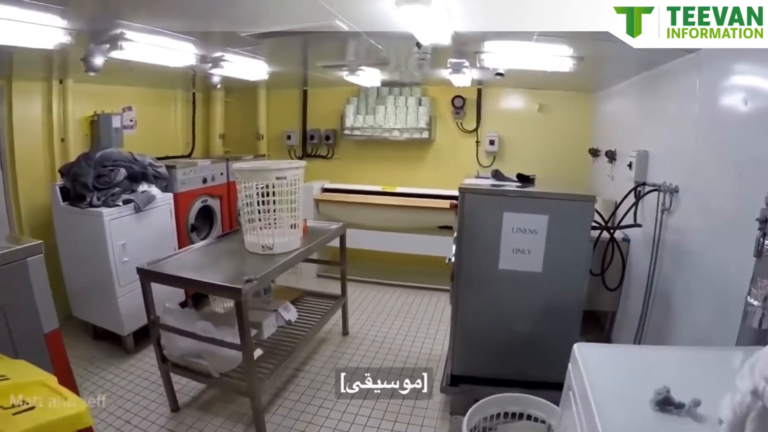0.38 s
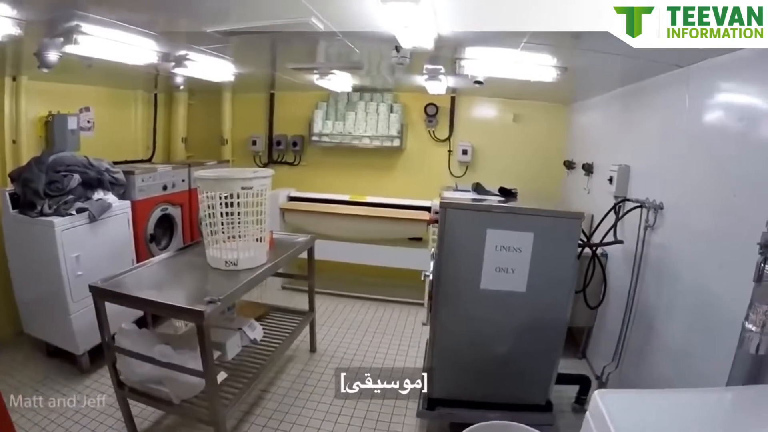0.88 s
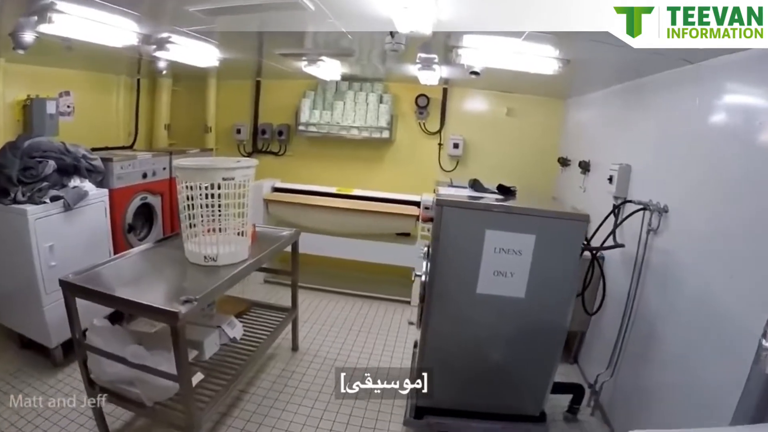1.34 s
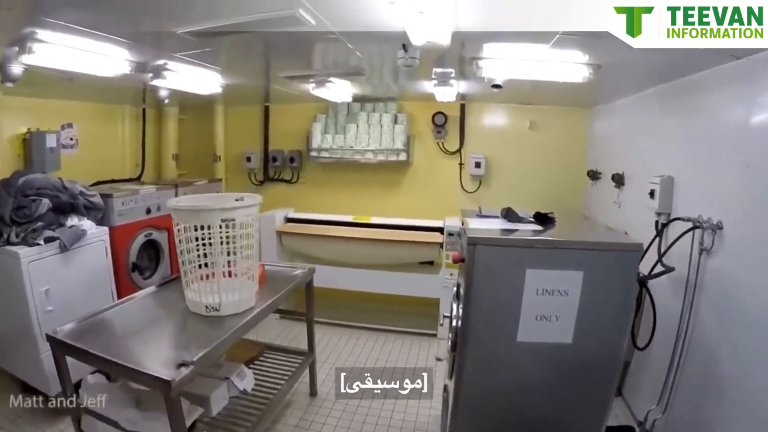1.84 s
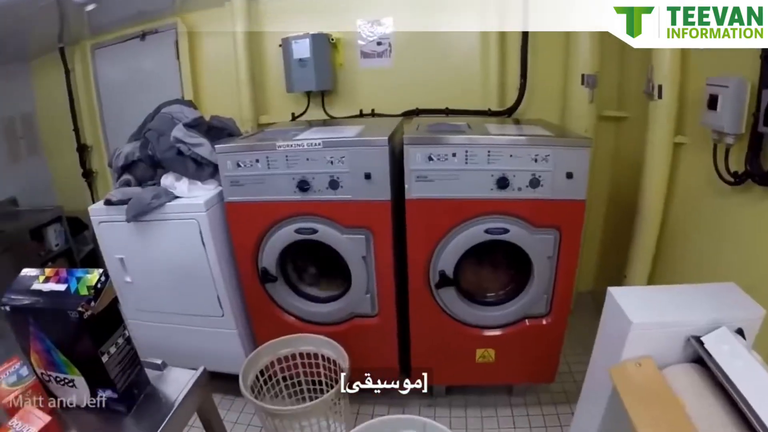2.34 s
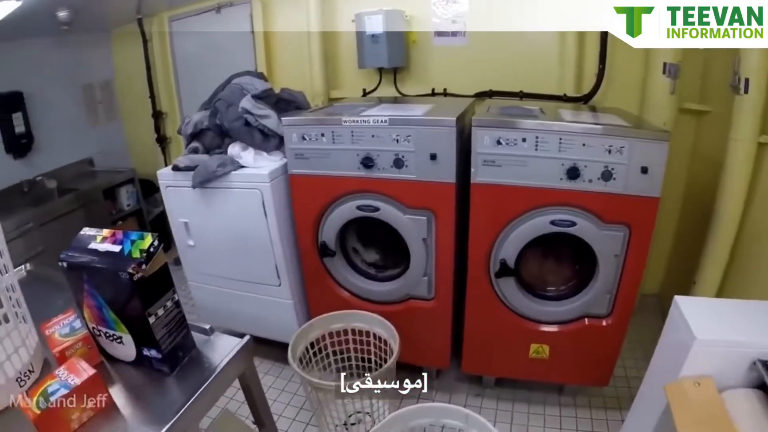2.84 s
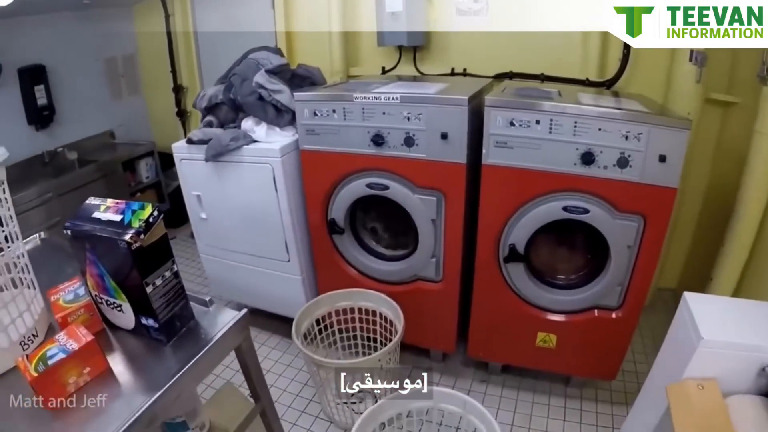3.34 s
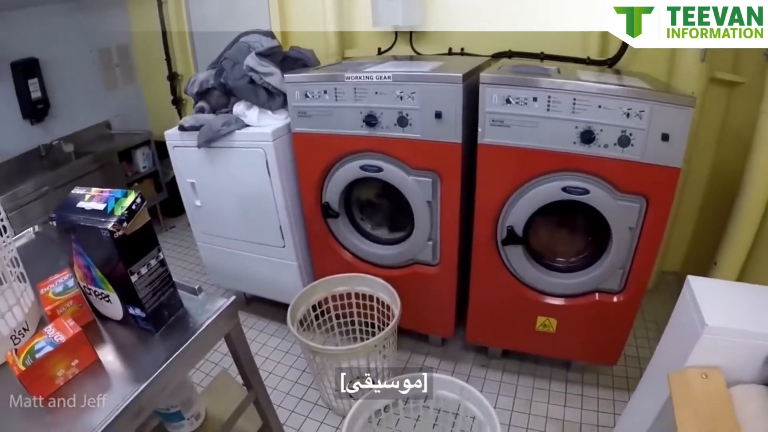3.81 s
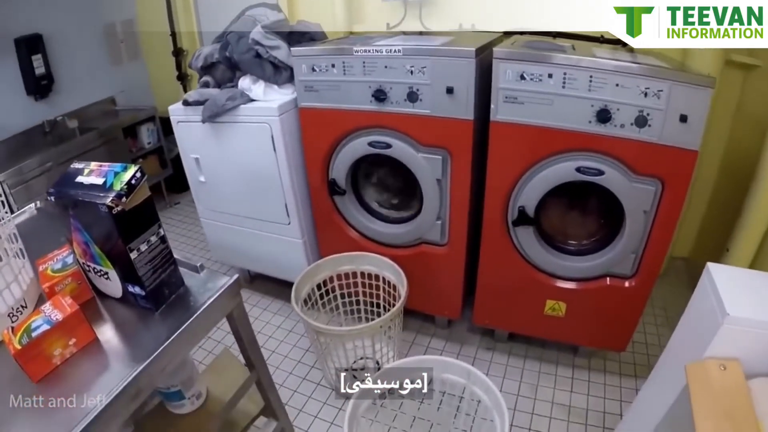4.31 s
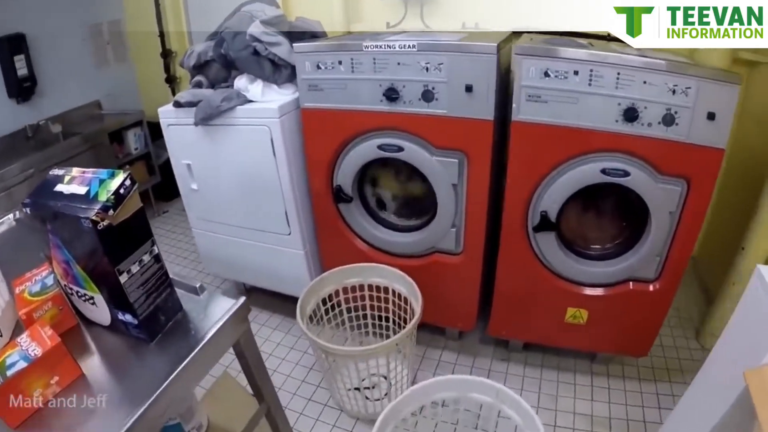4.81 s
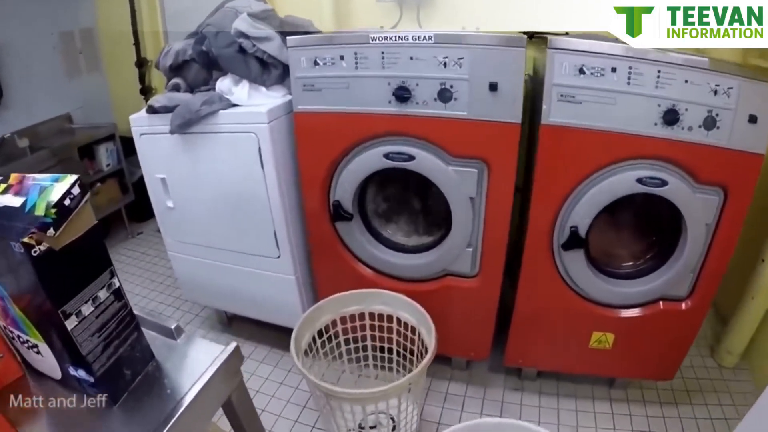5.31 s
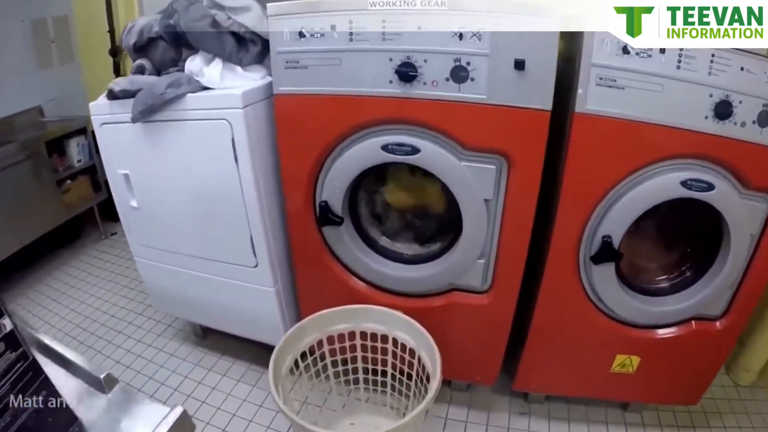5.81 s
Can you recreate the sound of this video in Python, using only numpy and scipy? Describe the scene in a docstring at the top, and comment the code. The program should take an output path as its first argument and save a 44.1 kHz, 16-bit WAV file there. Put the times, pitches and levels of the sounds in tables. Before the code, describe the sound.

In an enclosed metal-walled laundry room, a low machinery rumble drones throughout, uneven and gently swelling, with fan tone and electrical hum inside it. Near two seconds there is one dry click, then a very faint spray hiss sputters up, with tiny drops ticking. One fixed-sounding microphone hears it all, with dull treble.

```python
"""A steady machinery drone fills an enclosed steel room; after one dry click a thin hiss of spraying water fades in.
One microphone hears it all. Rumble is noise ringing in narrow resonances, the loudest of them swelling now and then;
fan, mains hum and small motors are wavering sines, and dull air noise is filtered noise.
The spray is flickering noise with a scatter of tiny drops; larger drops ping as brief clusters of partials,
and pipes whistle as thin tones that come and go."""
import sys
import numpy as np
from scipy import signal
from scipy.fft import rfft, irfft
from scipy.io import wavfile
from scipy.ndimage import uniform_filter1d

SR = 44100
rng = np.random.default_rng(int(sys.argv[2]) if len(sys.argv) > 2 else 0)


def dump(signal):
    """Clip the signal to [-1, 1] and save it as 16-bit WAV at the path in sys.argv[1]."""
    limited = np.clip(np.atleast_2d(signal).T, -1, 1)
    pcm = np.round(limited * 32767).astype(np.int16)
    wavfile.write(sys.argv[1], SR, pcm)


def volts_from_db(level):
    """Convert decibel levels to linear amplitude ratios."""
    exponent = np.asarray(level, float) / 20
    return 10 ** exponent


N = 261072  # length in samples
T = np.arange(N) / SR  # time of every sample, s
HZ = np.fft.rfftfreq(N, 1 / SR)  # frequency of every spectrum bin


def evened(x):
    """Scales to rms 1."""
    return x / np.sqrt(np.mean(x ** 2) + 1e-20)


def colour(points):
    """Gain at every frequency from (Hz, dB) points, joined on a log frequency axis, silent outside."""
    hz, db = np.transpose(points)
    return volts_from_db(np.interp(np.log(HZ + 1), np.log(hz + 1), db, left=-200, right=-200))


def curve(points):
    """Value at every moment from (s, value) points."""
    return np.interp(T, *np.transpose(points))


def noise(gain):
    """White noise filtered by a gain at every frequency."""
    return irfft(rfft(rng.standard_normal(N)) * gain, N)


def slow(hz):
    """Slow random movement of rms 1, mostly below hz."""
    return evened(noise(np.exp(-(HZ / hz) ** 2)))


def resonance(hz, width_hz):
    """Power response of one resonance, 1 at its centre."""
    return 1 / (1 + (2 * (HZ - hz) / width_hz) ** 2)


# dull air noise of the room, relative spectrum: pitch_hz [Hz], level_db [dB per Hz]
AIR = [(710, -31), (1200, -5.5), (1330, -5), (1520, -5), (1570, -8.5), (1680, -8.5), (1750, -4.5),
       (1910, -5), (1960, -9), (2100, -13), (2280, -16), (2420, -14.5), (2550, -18.5), (2680, -20),
       (2800, -21.5), (2950, -25.5), (3480, -27.5), (3860, -28.5), (6270, -47), (8340, -57), (9500, -71.5),
       (12400, -100), (20900, -120)]
# faint shaking below the resonances, relative spectrum: pitch_hz [Hz], level_db [dB per Hz]
SHAKE = [(20, -26.5), (33, -18), (40, -11), (48, -7), (56, -0.5), (64, -34)]
AIR_DB, SHAKE_DB = -47, -55.5  # rms


def air():
    """Broad air noise, rippled by the echoes of the room, and low shaking."""
    echo_t60_s = 0.5
    half_second = SR // 2
    echoes = rng.standard_normal(half_second) * volts_from_db(-60 * T[:half_second] / echo_t60_s)
    ripple = abs(rfft(echoes, N)) ** 0.26  # dense modes merge: only part of the ripple is left
    air_noise = evened(noise(colour(AIR) * ripple))
    shaking = evened(noise(colour(SHAKE)))
    return volts_from_db(AIR_DB) * air_noise + volts_from_db(SHAKE_DB) * shaking


# small motors whining faintly: pitch_hz [Hz], level_db [dB rms, before wavering]
MOTORS = [(672.9, -60), (748.3, -57.5)]


def motors():
    """Faint tones that drift a little in pitch and waver in strength."""
    tones = np.zeros(N)
    for hz, db in MOTORS:
        level = volts_from_db(db + 3.0 * slow(1.3))
        turns = np.cumsum(hz + 1.2 * slow(1.1)) / SR
        tones += level * np.sin(2 * np.pi * turns)
    return np.sqrt(2) * tones  # a sine of rms 1 peaks at sqrt(2)


# swells of the loudest standing waves: top_s [s],
# level_db [dB rms of the swell alone at its top, added in power to the resting level],
# length_s [s, at half power], boom [row of BOOMS once rounded]
SWELLS = [(0.166, -26.5, 0.072, 0.5), (0.448, -26.5, 0.22, 1), (0.764, -22, 0.18, 1), (1.183, -23, 0.13, 0),
          (1.563, -16, 0.078, 1), (1.912, -21, 0.13, 1), (2.303, -22, 0.1, 0), (2.474, -22.5, 0.083, -0.5),
          (2.853, -23, 0.083, 1), (3.162, -20, 0.042, 1), (3.351, -18, 0.1, 1), (3.573, -18.5, 0.076, 1),
          (4.055, -16, 0.098, 1), (4.407, -19, 0.095, 1), (4.677, -21.5, 0.25, 1),
          (5.202, -26.5, 0.088, 0.5), (5.386, -26, 0.062, 1.5), (0.4, -28.5, 0.21, 2.5),
          (1.9, -29, 0.38, 0), (2.62, -31, 0.17, 1.5), (3.4, -29.5, 0.68, 2), (4.5, -34.5, 0.53, 1.5),
          (5.3, -33, 1, 2), (1.2, -29.5, 0.41, 3), (2.75, -30.5, 0.48, 2), (3.7, -31.5, 1, 3),
          (4.62, -23.5, 0.37, 3)]


def swelling(boom, rest_db):
    """Resting level plus one bell-shaped rise in power for every swell of this standing wave."""
    power = volts_from_db(rest_db) ** 2
    for top_s, db, length_s, k in SWELLS:
        if round(k) == boom:
            power = power + volts_from_db(db) ** 2 * np.exp(-np.log(2) * (2 * (T - top_s) / length_s) ** 2)
    return np.sqrt(power) * np.ones(N)


def steered(gain, level, size):
    """Noise whose swells, slower than size samples, follow a given level instead of chance."""
    x = noise(gain)
    power = uniform_filter1d(uniform_filter1d(x ** 2, size=size), size=size)
    return level * x / (np.sqrt(abs(power)) + 1e-9)


# standing waves of the room: pitch_hz [Hz], width_hz [Hz], level_db [dB per Hz; relative inside BOOMS]
ROOM_MODES = [(63, 12, -60.5), (78.3, 8.4, -52), (86, 4, -52.5), (99.5, 4.4, -46.5), (109.3, 9, -45),
              (120.3, 14, -44.5), (136.8, 5.5, -47.5), (150.6, 5, -40), (162.3, 17, -45.5),
              (173.5, 10, -43), (183.7, 8, -48), (195, 9, -44.5), (206.9, 4.2, -42), (224.7, 7.1, -37.5),
              (242.7, 8, -35.5), (256.65, 4.5, -32), (263.9, 6, -41), (274.4, 6, -45.5), (285.3, 9, -46.5),
              (306.7, 24, -49), (323.2, 8.7, -48.5), (338.9, 5, -45.5), (352.3, 11, -49.5),
              (364.2, 6.5, -48.5), (374, 5.2, -47), (385.4, 5.8, -49), (392, 8.7, -57.5),
              (412.2, 26, -51.5), (438.6, 14, -52), (460, 15, -56.5), (469, 5.5, -55.5), (485.4, 9, -56),
              (496, 15, -62.5), (524.6, 37, -61)]
# sheet-metal casings ringing along: pitch_hz [Hz], width_hz [Hz], level_db [dB per Hz]
CASING_MODES = [(554, 21, -60.5), (581, 7.9, -66), (584, 7.3, -63.5), (601, 20, -64), (606, 6.3, -63.5),
                (637.7, 20, -61.5), (669.6, 11, -59), (675, 11, -63.5), (713, 6, -67), (694.5, 9, -60.5),
                (706, 13, -63), (734, 6.8, -60), (741, 6, -57), (760, 7.3, -67.5), (765, 11, -65.5),
                (790, 12, -65.5), (785, 10, -63.5), (800, 14, -69), (820, 12, -65), (849, 28, -66.5),
                (879, 8, -61.5), (895, 8.2, -58), (912, 7, -59.5), (923, 11, -66), (936, 7, -61.5),
                (950, 14, -64), (957, 8.4, -64), (976, 5.4, -65), (965, 9, -66), (1001, 10, -70)]
# air duct ringing along: pitch_hz [Hz], width_hz [Hz], level_db [dB per Hz]
DUCT_MODES = [(1017, 14, -63), (1036, 9, -67), (1050, 11, -65), (1056, 12, -62.5), (1078, 18, -64),
              (1094, 8, -66.5), (1105, 12, -63), (1125, 6.3, -59), (1156, 5, -66.5), (1142, 21, -70),
              (1190, 4, -73), (1172, 8, -76.5), (1232, 9, -72)]
# the loudest standing waves: lowest_hz [Hz], highest_hz [Hz], resting_db [dB rms], shortest_swell_s [s]
BOOMS = [(233.6, 249, -30.5, 0.027), (252.5, 272, -29, 0.078), (95, 130, -33.5, 0.14),
         (141, 185, -29.5, 0.25)]


def rumble():
    """Noise through all resonances; each has steep skirts, so the valleys between them stay dark."""
    power = np.zeros(len(HZ))
    for hz, width_hz, db in ROOM_MODES + CASING_MODES + DUCT_MODES:
        power += volts_from_db(db) ** 2 * resonance(hz, width_hz) ** 2
    gain = np.sqrt(power * SR / 2)  # from power per Hz to a gain on white noise
    booms = np.zeros(N)
    elsewhere = np.ones(len(HZ), bool)
    for k, (lowest_hz, highest_hz, rest_db, shortest_s) in enumerate(BOOMS):
        band = (HZ > lowest_hz) & (HZ <= highest_hz)
        booms += steered(gain * band, swelling(k, rest_db), size=round(shortest_s * SR))
        elsewhere &= ~band
    return booms + noise(gain * elsewhere)


# how firmly the high whine of the fan reaches the microphone: time_s [s], gain_db [dB]
FIRMNESS = [(0, -1), (.45, -1.5), (.6, -6), (1.3, -9), (1.88, -7.5), (1.96, 0), (2.45, -1.5), (2.85, 0.5),
            (3.0, -5), (3.3, -5.5), (3.6, 1), (3.9, 0.5), (4.75, 4), (4.95, -8), (5.4, -2.5), (5.7, 5),
            (5.92, -6)]
# fan blade tone and overtones:
# multiple [of BLADE_HZ], level_db [dB rms, before firmness and wavering], share [of FIRMNESS, 0-1], waver_db [dB]
BLADE = [(1, -29.5, 0.03, 3.0), (2, -39, 0.2, 2), (3, -56, 0, 1.5), (4, -45.5, 0.99, 1.5),
         (5, -51.5, 0.5, 1)]
BLADE_HZ = 215.41  # blades passing per second, before drift
HUM_HZ, HUM_DB = 120.06, -39  # mains hum, rms before wavering


def fan():
    """Blade tone and overtones on one barely drifting shaft speed, plus mains hum."""
    turns = np.cumsum(BLADE_HZ * (1 + 0.00029 * slow(0.54))) / SR
    tones = np.zeros(N)
    for multiple, db, share, waver_db in BLADE:
        level = volts_from_db(db + share * curve(FIRMNESS) + waver_db * slow(2.4))
        tones += level * np.sin(2 * np.pi * (multiple * turns + rng.random()))
    hum = volts_from_db(HUM_DB + 2.5 * slow(0.54)) * np.sin(2 * np.pi * (HUM_HZ * T + rng.random()))
    return np.sqrt(2) * (tones + hum)


# thin whistles from the pipework: top_s [s], length_s [s], pitch_hz [Hz], level_db [dB rms at the top]
WHISTLES = [(2.43, .11, 7320, -72), (2.61, .1, 6032, -76), (2.72, .15, 6100, -76.5),
            (2.59, .3, 4115, -78.5), (2.72, .15, 7320, -79.5), (2.92, .12, 6032, -78), (3.4, .2, 6045, -79),
            (2.86, .15, 7320, -79), (3.36, .15, 3350, -71), (3.51, .12, 6545, -78), (3.65, .2, 4100, -80),
            (3.78, 0.12, 6035, -70), (3.78, .08, 6120, -81), (3.777, .2, 6545, -73.5),
            (3.95, .2, 6525, -81), (4.06, 0.22, 6030, -78), (4.26, .08, 6080, -77), (4.46, .1, 6030, -76),
            (4.599, .11, 6460, -72), (4.61, .16, 7620, -76.5), (4.71, .11, 7350, -70.5),
            (4.86, .15, 4134, -79), (5.08, .14, 8030, -72), (5.29, .19, 7650, -75.5), (5.3, .12, 6028, -74),
            (5.3, .12, 6090, -76), (5.52, .1, 6112, -78), (5.58, .12, 6025, -77), (5.57, .16, 6525, -74)]


def whistles():
    """Each whistle is a slightly unsteady tone under a bell-shaped rise and fall."""
    unsteady_time = T + np.cumsum(0.00037 * slow(20)) / SR
    tones = np.zeros(N)
    for top_s, length_s, hz, db in WHISTLES:
        bell = np.exp(-2 * ((T - top_s) / length_s) ** 2)
        tones += volts_from_db(db) * bell * np.sin(2 * np.pi * hz * unsteady_time)
    return np.sqrt(2) * tones


CLICK_S, CLICK_DB, CLICK_RISE_S = 1.9518, -19.5, 0.00069  # moment, peak level, time constant of the rise


def click():
    """A short exponential ramp up that drops back at once."""
    return volts_from_db(CLICK_DB) * np.exp(-abs(T - CLICK_S) / CLICK_RISE_S) * (T < CLICK_S)


def patches(x, depth_db):
    """Lets regions of a few hundred Hz by a few tens of ms flicker up and down."""
    z = signal.stft(x, nperseg=256, noverlap=192)[2]
    field = uniform_filter1d(rng.standard_normal(z.shape), size=4, axis=0)  # across frequency
    field = uniform_filter1d(field, size=20, axis=1)  # across time
    return signal.istft(z * volts_from_db(depth_db * evened(field)), nperseg=256, noverlap=192)[1][:N]


def ping(hz, t60, grit):
    """A drop: a dry tick of close, unevenly spaced partials that start almost together and die at once."""
    t = T[:2048]
    spacing = np.linspace(-1.6, 1.6, num=len(grit)) + 0.2 * grit
    partials_hz = hz * (1 + 0.062 * spacing)
    phases = 0.71 * grit[::-1, None]
    weights = np.hanning(len(grit) + 2)[1:-1]  # the middle partials are strongest
    ring = weights @ np.sin(2 * np.pi * partials_hz[:, None] * t + phases) / 4.9
    onset = 1 - np.exp(-t / 0.00043)
    return 1.9 * ring * volts_from_db(-60 * t / t60) * onset


# water spray, relative spectrum: pitch_hz [Hz], level_db [dB per Hz]
SPRAY = [(1800, -33), (2600, 2), (3400, 0), (3750, -3.5), (4120, 0.5), (4400, -6), (4900, -4.5),
         (5700, -4.5), (6050, -2.5), (6800, -1), (7600, -2), (8500, -3), (9100, -5), (9700, -6.5),
         (10100, -17.5)]
# pipework ringing faintly in the spray: pitch_hz [Hz], width_hz [Hz], level_db [dB over the hiss]
PIPE_RINGS = [(3370, 40, -0.5), (4080, 60, 0), (6032, 20, 3), (6092, 45, 1.5), (6537, 40, 1.5),
              (7309, 25, 2.5), (7606, 25, 6), (8010, 16, 7.5), (8250, 20, 2), (8441, 16, 8), (8657, 20, 3)]
# spray level, sputtering up after the click: time_s [s], level_db [dB rms of the hiss]
SPRAY_RISE = [(1.95, -83), (2.01, -81), (2.02, -72), (2.11, -74), (2.13, -67), (2.25, -65.5), (2.33, -63),
              (2.5, -61), (2.7, -60), (5.92, -59.5)]


def spray():
    """Flickering hiss with faint rings and a random scatter of tiny drops at many pitches."""
    rings = 1 + sum(volts_from_db(db) ** 2 * resonance(hz, width_hz) for hz, width_hz, db in PIPE_RINGS)
    hiss = evened(patches(noise(colour(SPRAY) * np.sqrt(rings)), 1.2))
    drops = np.zeros(N)
    for hz in np.geomspace(2600, 9200, num=24):
        falls = rng.random(N) < 6.0 / SR  # about six drops a second at each pitch
        sizes = volts_from_db(3.5 * np.minimum(rng.exponential(1, N), 2.5)) * falls
        drops += signal.oaconvolve(sizes, ping(hz, .03, rng.standard_normal(9)))[:N]
    drops = irfft(rfft(drops) * colour(SPRAY), N)
    return volts_from_db(curve(SPRAY_RISE)) * (hiss + volts_from_db(-10.5) * evened(drops)) * (T > CLICK_S)


# the clearest single drops: start_s [s], level_db [dB, roughly the peak], pitch_hz [Hz], t60_s [s]
DROPS = [(2.0198, -64, 7300, .03), (2.095, -55, 4000, .03), (2.15, -55, 3600, .02),
         (2.5657, -45, 3380, .035), (2.706, -54, 4280, .05), (2.7676, -44, 5150, .022),
         (2.868, -45, 8760, .025), (2.869, -55, 4130, .04), (2.953, -54, 3800, .03),
         (3.134, -52, 7020, .025), (3.149, -50, 4300, .025), (3.4068, -46, 4220, .05),
         (3.443, -52, 4130, 0.043), (3.4845, -36, 7240, 0.019), (3.4848, -48, 5800, .018),
         (3.602, -45.5, 3260, .06), (3.6795, -50, 8000, .05), (3.704, -52, 5340, .02),
         (3.72, -50, 5400, 0.055), (3.768, -53, 7650, .025), (3.8117, -50, 5750, .035),
         (3.822, -55, 3960, .04), (3.842, -52, 6600, .018), (3.846, -53, 3950, .025),
         (3.8644, -48, 5600, .025), (3.892, -51, 3940, .04), (3.9513, -41.5, 2850, 0.034),
         (4.239, -44, 7700, .028), (4.331, -52, 3470, .04), (4.415, -52, 5660, .025),
         (4.519, -48, 2930, .025), (4.629, -53, 4300, .03), (4.779, -49, 3170, .03),
         (4.785, -53, 4500, .03), (4.801, -49, 4130, .025), (4.8418, -46, 3920, .05),
         (4.883, -46.5, 6470, .025), (4.9436, -50, 2870, .028), (5.0492, -47, 3350, .04),
         (5.049, -53, 8300, .04), (5.09, -51, 8150, .07), (5.115, -52, 4200, .03), (5.223, -54, 4320, .03),
         (5.511, -53, 7130, .025), (5.5982, -50, 3320, .025), (5.641, -51, 4480, .05),
         (5.7309, -44, 3290, .028)]


def big_drops():
    """The drops that stand out of the hiss, each a ping with its own random partials."""
    out = np.zeros(N)
    for (start_s, db, hz, t60), grit in zip(DROPS, rng.standard_normal((len(DROPS), 9))):
        out[round(start_s * SR):][:2048] += volts_from_db(db) * ping(hz, t60, grit)
    return out


def scene():
    """All sources at one microphone."""
    drone = air() + motors() + rumble() + fan()
    water = whistles() + spray() + big_drops()
    return (drone + click() + water)[None]


def roll_off(x):
    """The treble ends steeply here."""
    return signal.sosfilt(signal.butter(12, 9850, fs=SR, output="sos"), x)


def record(dry):
    """The microphone drops the deepest bass, below about 36 Hz, and the treble ends steeply near 9200 Hz."""
    treble_limit = 1 + (HZ / 9200) ** 28
    bass_limit = 1 + (36 / (HZ + 1)) ** 6
    limited = irfft(rfft(dry) / treble_limit / bass_limit, N)
    return roll_off(limited)


dry = scene()
out = record(dry)
dump(out)
```